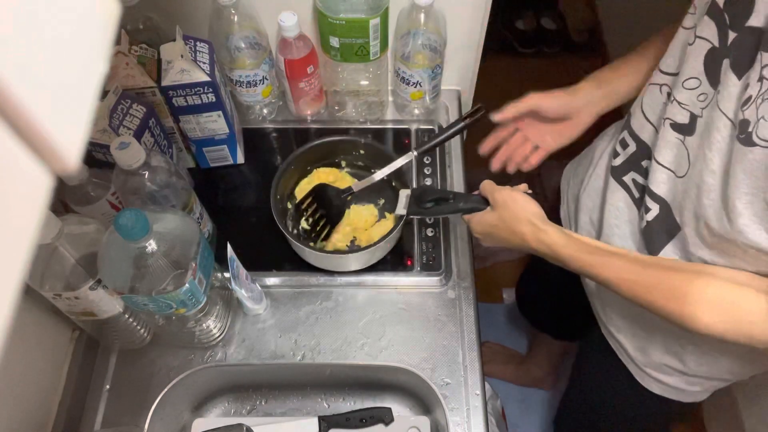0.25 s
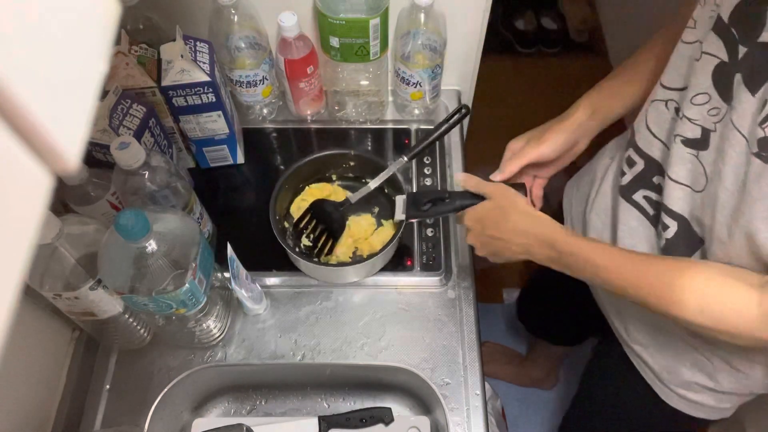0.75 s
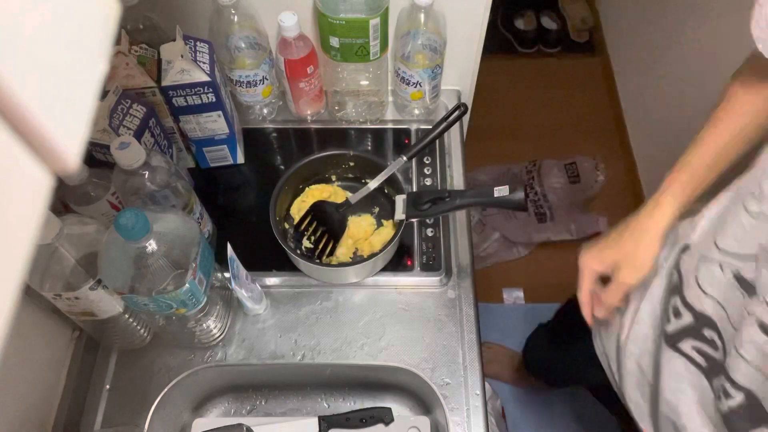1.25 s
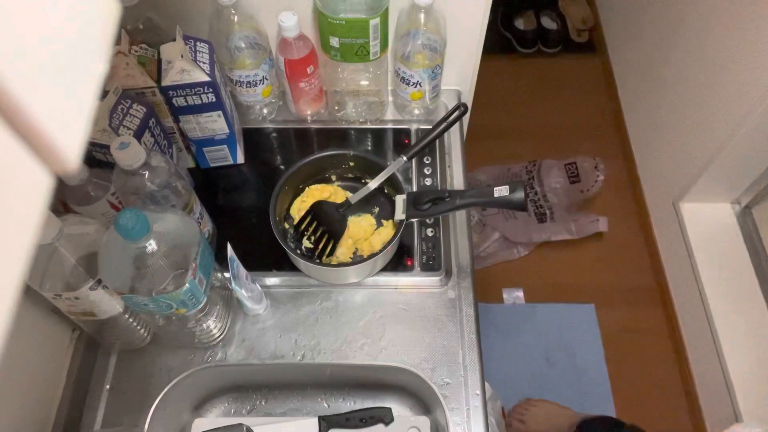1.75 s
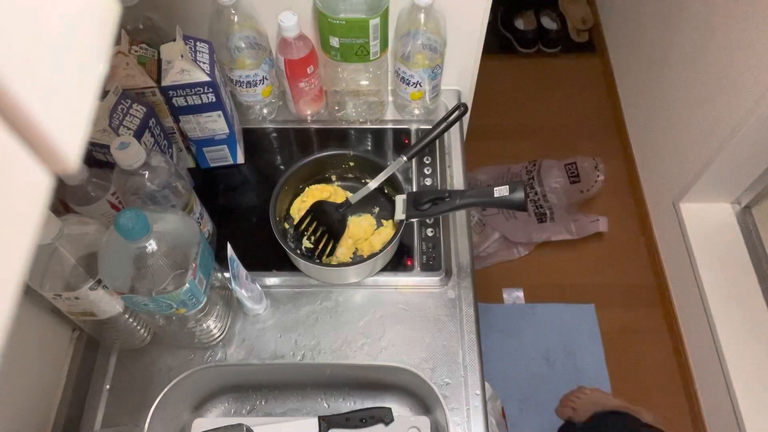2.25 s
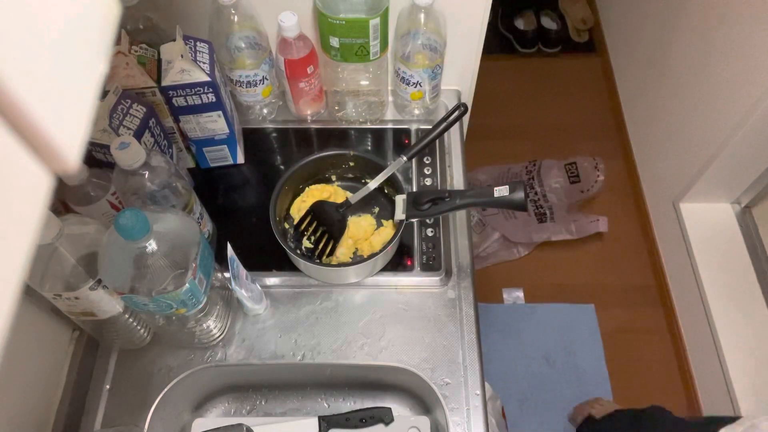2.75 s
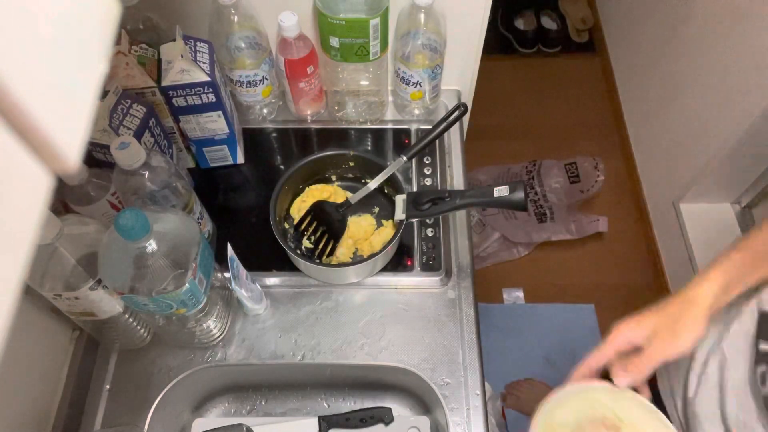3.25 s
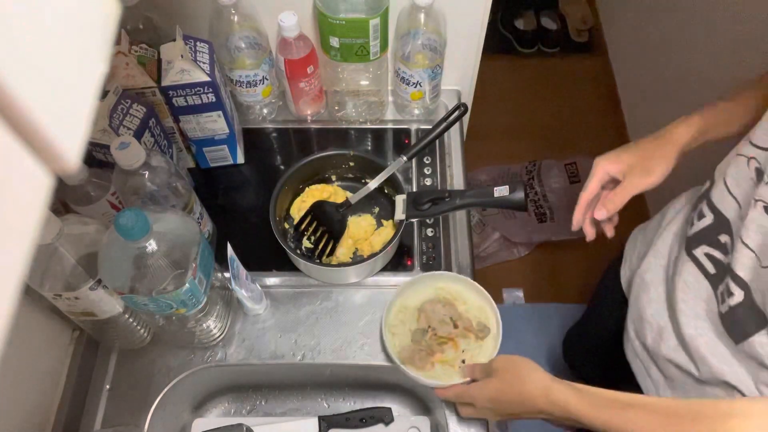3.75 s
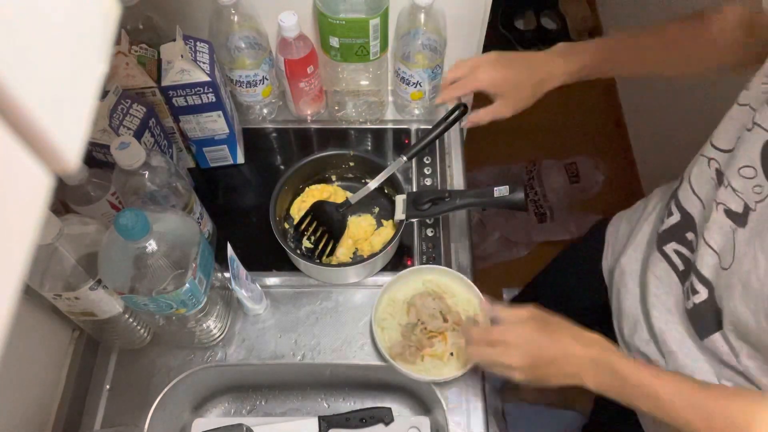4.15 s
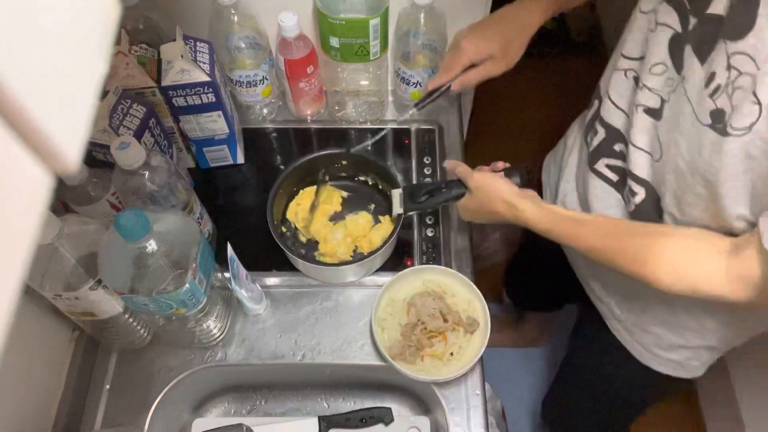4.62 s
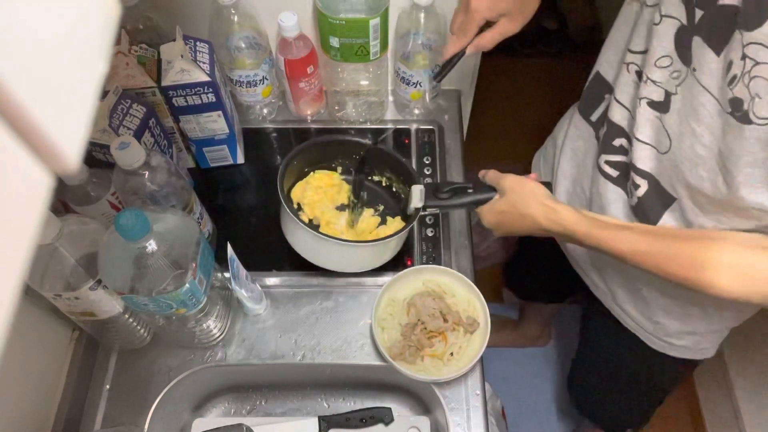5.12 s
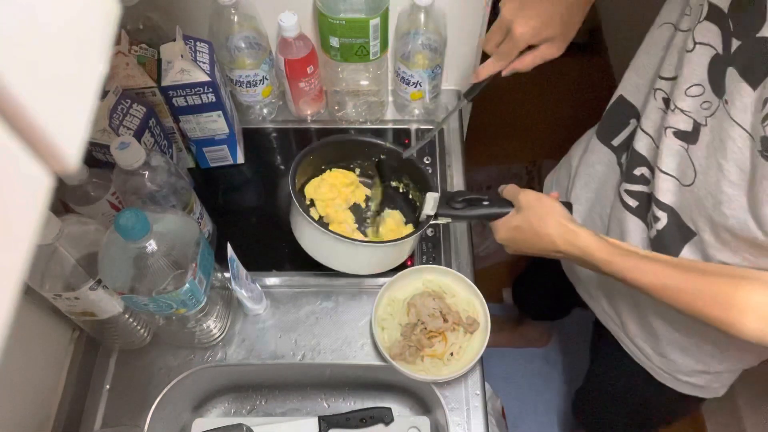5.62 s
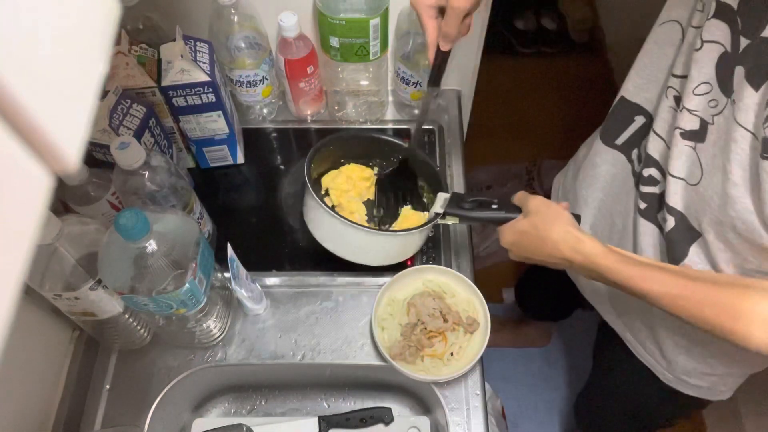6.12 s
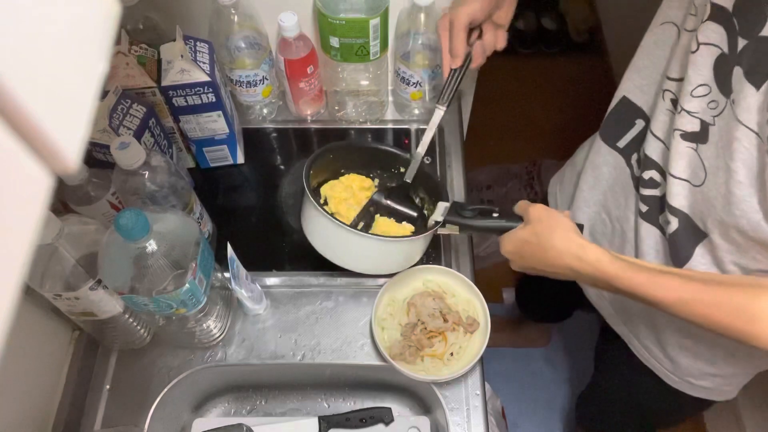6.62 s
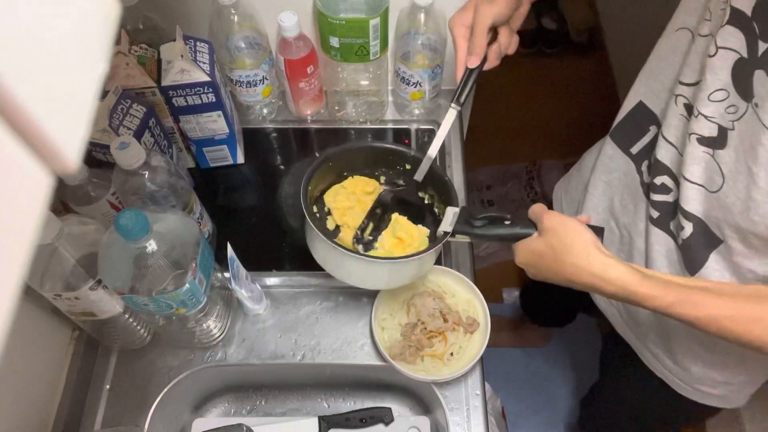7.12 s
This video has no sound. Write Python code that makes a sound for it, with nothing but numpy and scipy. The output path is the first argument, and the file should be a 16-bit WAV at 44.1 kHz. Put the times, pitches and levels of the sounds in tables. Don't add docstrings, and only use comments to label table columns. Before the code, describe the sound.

A phone close to the cooktop hears steady low extractor and cooktop fans in stereo. Early on come a faint rim tap, a hard plastic snap and a heavy dull pan thump. Only small ticks and soft clothing follow, until a bowl lands with a boomy clunk and tiny bounce. Later a turner knocks the saucepan sharply, then taps and scrapes it in a quick cluster before the hum is left with slight rustling.

```python
import sys
import numpy as np
from scipy import signal
from scipy.fft import rfft, irfft
from scipy.io import wavfile
from scipy.ndimage import uniform_filter1d

SR = 44100
rng = np.random.default_rng(int(sys.argv[2]) if len(sys.argv) > 2 else 0)


def inscribe(sig):
    pcm = np.round(np.clip(np.atleast_2d(sig).T, -1, 1) * 32767)
    wavfile.write(sys.argv[1], SR, pcm.astype(np.int16))


def magnitude_from_level(level_db):
    exponent = np.asarray(level_db, float) / 20
    return 10 ** exponent


N = 325458


def evened(x):
    return x / np.sqrt(np.mean(x ** 2) + 1e-20)


def unit_energy(x):
    return x / np.linalg.norm(x)


def read(points, hz):
    f, value = np.transpose(points)
    return np.interp(np.log(hz + 1), np.log(f + 1), value)


def add(mix, s, sound):
    part = mix[..., round(s * SR):][..., :sound.shape[-1]]
    part += sound[..., :part.shape[-1]]


def mirrored(x):
    return np.concatenate([x, x[:, ::-1]], axis=1)


def colour(points):
    log_gain = np.log(magnitude_from_level(read(points, abs(np.fft.fftfreq(4096, 1 / SR)))))
    taps = np.fft.ifft(np.exp(np.conj(signal.hilbert(log_gain)))).real[:2048]
    return unit_energy(taps)


def ring(modes, rise=0.00061, turns=0):
    t = np.arange(SR // 2) / SR
    sound = np.zeros(len(t))
    for hz, db, t60 in modes:
        build_up = 1 - np.exp(-t * hz / (turns + 0.0011))
        sound += magnitude_from_level(db - 60 * t / t60) * np.sin(2 * np.pi * hz * t) * build_up
    return unit_energy(sound * (1 - np.exp(-t / rise)))


def swells(rows, sharp):
    out = np.zeros(N)
    for middle, length, db in rows:
        add(out, middle - length / 2, magnitude_from_level(db) * np.hanning(round(length * SR)) ** sharp)
    return out


def grains(per_s, spread_db):
    size = magnitude_from_level(spread_db * np.minimum(rng.exponential(1, N), 4))
    happens = rng.random(N) < per_s / SR
    return evened(size * rng.standard_normal(N) * happens)


# (f/Hz, level/dB [per Hz])
AIR = [(25, -87.5), (45, -67), (65, -64), (140, -61), (200, -70), (350, -78.5), (480, -78.5), (850, -80),
       (1450, -91), (2500, -91), (3600, -100), (6000, -105), (9000, -114), (15500, -136)]
# (f/Hz, width f/Hz, level/dB [per Hz])
DUCT = [(83.3, 11.9, -45.5), (110.3, 4.7, -57.5), (158, 7.2, -52.5), (260.1, 38.2, -54.5), (297.7, 28, -60),
        (425.7, 16.9, -63), (594, 40, -74), (656, 79, -82), (701.5, 61, -71), (1040.3, 99, -71),
        (1176, 55, -74), (1340, 13, -74.5), (1680, 520, -83.5), (2025, 370, -86.5), (2933, 850, -98)]


def fans():
    frames, hz = N // 1024 + 5, np.fft.rfftfreq(4096, 1 / SR)
    a, b, patches = rng.standard_normal((2, frames, 2049, 3)).transpose(3, 0, 2, 1)
    patches = uniform_filter1d(patches[0], 30, 0)
    patches = evened(uniform_filter1d(patches, 4, 1))
    power = magnitude_from_level(read(AIR, hz)) ** 2
    for f, width, db in DUCT:
        power += magnitude_from_level(db) ** 2 / (1 + (2 * (hz - f) / width) ** 2) ** 2
    spectrum = (a + 1j * b) * np.sqrt(power)[:, None] * magnitude_from_level(1.8 * patches)
    noise = signal.istft(spectrum, nperseg=4096, noverlap=3072)[1]
    return evened(noise[:, :N]) * np.sqrt(power.sum() * SR / 4096)


# (middle t/s, length t/s, level/dB, f/Hz)
HUM_SWELLS = [(0.192, .26, -27.5, 81.4), (0.375, 0.11, -27, 83.9), (0.601, .25, -35.5, 90.6),
              (0.755, 0.0857, -23, 80.4), (0.869, 0.17, -26, 84.2), (1.097, .3, -26, 82.8), (1.24, .12, -31, 83),
              (1.365, .24, -31, 87.2), (1.771, .14, -30.5, 86), (1.905, 0.24, -30.5, 86),
              (2.319, 0.29, -30, 85.7), (2.522, 0.31, -27, 85.7), (2.768, .3, -27, 86.1),
              (2.946, 0.12, -27.5, 83.3), (3.274, .17, -23.5, 81.2), (3.427, .22, -26.5, 86.1),
              (3.642, .16, -24.5, 84.1), (3.924, 0.18, -23, 85.5), (4.054, .24, -28, 82),
              (4.244, .13, -25.5, 87.4), (4.474, .3, -29.5, 89), (4.755, 0.1256, -32.5, 84.5),
              (4.939, .28, -27, 89.15), (5.194, 0.29, -27.5, 89.8), (5.608, .12, -33, 80.4),
              (5.841, 0.16, -33.5, 85.2), (6.072, 0.25, -31.5, 78.85), (6.687, 0.1365, -29.5, 83.9),
              (6.997, .26, -26.5, 84.9), (7.215, 0.16, -27.5, 87)]


def hum():
    peak_db, sharpness = 2.5, 1.48
    out = np.zeros(N)
    for (middle, length, db, hz), phase in zip(HUM_SWELLS, rng.random(len(HUM_SWELLS))):
        t = np.arange(round(length * SR)) / SR
        swell = np.sin(np.pi * t / length) ** sharpness
        add(out, middle - length / 2, magnitude_from_level(db + peak_db) * swell * np.sin(2 * np.pi * (hz * t + phase)))
    return out


# (f/Hz, time to fall 60 dB t/s)
ROOM = [(100, 0.93), (260, 0.85), (700, 0.56), (1840, 0.32), (4850, 0.42), (12800, 0.25)]


def room(x):
    taps = np.zeros((2, SR))
    at = np.arange(200, SR - 20, 20) + rng.integers(0, 20, (2, (SR - 201) // 20))
    np.put_along_axis(taps, at, rng.choice([-1., 1.], at.shape), 1)
    hz, t, z = signal.stft(taps, SR, nperseg=256)
    fade = magnitude_from_level(-60 * t / read(ROOM, hz)[:, None])
    tail = signal.istft(z * fade, SR, nperseg=256)[1]
    return signal.fftconvolve(x[None], tail / np.linalg.norm(tail[0]), axes=1)[:, :N]


# (middle t/s, length t/s, level/dB)
MOVES = [(.93, .25, -67), (1.55, 1, -79.5), (2.13, .2, -84), (2.6, 0.23, -81), (2.885, 0.07, -76),
         (3.095, 0.026, -81), (3.28, 0.19, -73), (3.47, 0.079, -63), (3.53, 0.067, -83), (3.655, 0.05, -81),
         (4.07, 0.39, -79), (4.37, 0.099, -67.5), (4.5, 0.19, -61), (4.68, 0.46, -70.5),
         (5.125, 0.18, -67.5), (5.195, .08, -85.5), (5.262, 0.078, -75.5), (5.65, 0.38, -72.5),
         (5.8, 0.068, -69.5), (5.89, .15, -65), (6.09, 0.33, -65), (6.385, 0.099, -67.5), (6.52, 0.24, -82),
         (6.72, 0.26, -72), (6.83, 0.15, -73), (7.22, 0.36, -80.5)]
# (f/Hz, level/dB [per Hz])
CLOTH = [(1500, -18.5), (3000, 7.5), (5000, -4), (7500, 4), (10000, -4), (13000, -7), (16000, -17)]


def rustle():
    flutter_db, flutter_s = 3, 0.013
    crackle = signal.oaconvolve(grains(4700, 3.2), colour([(300, -36.5)] + CLOTH))[:N]
    flutter = evened(uniform_filter1d(rng.standard_normal(N), size=round(flutter_s * SR)))
    return magnitude_from_level(3.0 + flutter_db * flutter) * swells(MOVES, 0.73) * crackle


# (t/s, peak level/dB, f/Hz, time to fall 60 dB t/s)
TICKS = [(0.8452, -46.5, 12150, 0.064), (0.9282, -49.5, 11920, 0.046), (1.057, -65, 4900, 0.068),
         (1.7598, -51.5, 4560, 0.053), (2.0851, -56.5, 4710, 0.054), (2.364, -59.5, 4800, 0.048),
         (3.0885, -80, 4570, 0.055), (3.27, -51.5, 4760, 0.078), (3.4436, -48, 5340, 0.049),
         (3.8311, -35, 2510, 0.036), (3.8506, -49.5, 2600, 0.034), (3.9086, -51, 4670, 0.18),
         (4.3697, -45.5, 8850, 0.067), (4.4443, -49.5, 5030, 0.054), (4.7828, -60.5, 5600, 0.023),
         (5.182, -45.5, 4750, 0.068), (5.2474, -54, 4830, 0.05), (5.377, -49, 11500, 0.016),
         (5.3908, -30.5, 2200, .015), (5.464, -58, 13500, .02), (5.564, -49, 4700, 0.079),
         (5.9559, -41.5, 2520, 0.027), (5.9908, -48, 2400, .02), (6.1489, -47, 3000, 0.022),
         (6.5095, -58, 4600, 0.022), (6.6427, -60, 5000, 0.05), (6.858, -62.5, 4600, 0.057),
         (7.0004, -61.5, 4900, 0.077)]


def ticks():
    out, t = np.zeros(N), np.arange(SR // 8) / SR
    for s, db, hz, t60 in TICKS:
        tone = [(hz / 4, -14), (hz / 1.9, -4), (hz, 0), (hz * 1.3, -6), (hz * 4, -20)]
        burst = signal.fftconvolve(rng.standard_normal(len(t)), colour(tone))[:len(t)]
        add(out, s, magnitude_from_level(db - 5.0 - 60 * t / t60) * burst * np.minimum(t / 0.0019, 1))
    return out


# (f/Hz, level/dB, time to fall 60 dB t/s)
PAN = [(706, -8, 0.32), (653, -1.5, 0.12), (732.5, -2.5, 0.11), (873, -10, 0.022), (1296, 1, 0.071),
       (1344, -14, 0.13), (1962, -7.5, .05), (2190, -8.5, 0.045), (2215, -7.5, .09), (3240, -16, 0.082),
       (3924, -31, .07), (5098, -28, 0.076), (6100, -35, 0.063), (7230, -27, 0.15)]
# (middle t/s, length t/s, pressure level/dB, floor flexing level/dB)
STROKES = [(5.812, 0.053, -71.5, -42), (5.885, .06, -76, -53), (7.3, 0.03, -72, -45),
           (5.855, 0.047, -47.5, -45.5), (6.025, 0.16, -54, -55.5), (5.2, 0.12, -65, -63),
           (5.4, 0.043, -61, -48), (6.312, 0.061, -69.5, -60), (5.4, 0.062, -58, -43)]
# (middle t/s, length t/s, level/dB)
SINGS = [(5.8, 0.065, -76), (5.865, .05, -60), (6.04, .1, -66), (6.11, .08, -63), (6.16, .07, -61)]


def scrape():
    edge = swells([row[:3] for row in STROKES], 1.0)
    flex = swells([row[:2] + row[3:] for row in STROKES], 0.48)
    slips = grains(3200, 3.5)
    pressed = [(f, db + 16.0 * np.log2(f / 716), 0.78 * t60) for f, db, t60 in PAN[5:]]
    low = [(f, db, 0.33 * t60) for f, db, t60 in PAN[:3]]
    high = [(f, db, 1.3 * t60) for f, db, t60 in PAN[-3:]]
    plastic = colour([(500, -14.0), (1500, 8.0), (3000, 0), (7000, -7.0), (15000, -22.5)])
    rings = signal.oaconvolve(slips * edge, ring(pressed))[:N]
    hiss = signal.oaconvolve(slips * edge, plastic)[:N]
    floor = signal.oaconvolve(slips * flex, ring(low))[:N]
    sing = signal.oaconvolve(slips * swells(SINGS, 0.94), ring(high))[:N]
    return sing + magnitude_from_level(-10.0) * rings + magnitude_from_level(5.5) * hiss + magnitude_from_level(1.5) * floor


def rattle(t, t60, light, snap_db, points):
    snap_s = 0.01
    bounces = magnitude_from_level(2.5 * evened(uniform_filter1d(rng.standard_normal(len(t)), 60)))
    noise = rng.standard_normal(len(t)) * bounces
    bass = signal.filtfilt(*signal.butter(2, 500, fs=SR), noise)
    crack = signal.filtfilt(*signal.butter(2, 2600, "high", fs=SR), noise)
    rise = 1 - np.exp(-t / (0.0006 + 0.004 * light ** 4))
    sound = crack * magnitude_from_level(-60 * t / (1.4 * t60)) * rise
    sound += (noise - bass - crack) * magnitude_from_level(-60 * (t / t60) ** 2.0) * rise ** 2
    sound += bass * magnitude_from_level(-60 * t / (1.22 * t60)) * (1 - np.exp(-t / 0.0022)) ** 2
    z = rfft(sound)
    level = np.sqrt(uniform_filter1d(abs(z) ** 2, size=25))
    sound = irfft(z / level, len(t)) * np.cos(np.pi / 2 * t / t[-1]) ** 2
    sound = evened(sound) + magnitude_from_level(snap_db) * evened(crack * magnitude_from_level(-60 * t / snap_s))
    return unit_energy(signal.fftconvolve(sound, colour([(35, -38.5)] + points + [(17000, -95.0)])))


# (t/s, level/dB, rattle's time to fall 60 dB t/s, pan ring level/dB, counter ring level/dB)
BLOWS = [
    (0.078, -27.5, 0.055, -7, -31),
    (0.491, -12, 0.067, -37, -23),
    (.7298, -11, 0.099, -19.5, -20),
    (3.7468, -10, 0.079, -23, -15.5),
    (5.3863, -15.5, 0.048, 3, -14),
    (3.8288, -33, 0.086, -21, -20),
    (5.783, -54.5, 0.14, 7.5, -31),
    (5.852, -40.5, 0.038, 0, -31),
    (5.945, -43.5, 0.13, -5.5, -27),
    (6.0187, -46, 0.21, 7, -34),
]
# (f/Hz, level/dB [per Hz])
TAP = [(100, -21.5), (750, 9), (2200, 4.5), (3200, -3.5), (5000, -20.5), (7500, -21.5), (13000, -28),
       (15500, -51)]
DROP = [(100, -11), (170, -7), (280, -23.5), (450, -24), (750, -23), (1200, 1.5), (2000, -14),
        (3200, -14.5), (5000, -31), (7500, -5), (10000, -16), (13300, -21.5), (14200, -45.5)]
LATCH = [(100, -12.5), (170, -3), (280, -1.5), (450, 1), (850, -3), (1300, -10), (2000, -10.5), (3200, -14),
         (5000, -22.5), (7500, -18.5), (10000, -27.5), (13000, -39), (15500, -48.5)]
THUD = [(100, -22), (170, -6), (280, -8.5), (450, -12), (900, -23.5), (1200, -22), (2000, -27), (3200, -30),
        (5000, -33.5), (7500, -34), (10000, -37), (14300, -48.5), (15100, -70.5)]
BOWL = [(100, 10), (170, 0), (280, -31.5), (450, -6), (850, -16.5), (1200, -18), (2000, -16.5),
        (3200, -19.5), (5000, -32.5), (7500, -36), (10000, -41), (13000, -49.5), (15500, -58)]
KNOCK = [(100, -25.5), (170, -34), (280, -19), (450, -21), (750, 2.5), (1000, -9.5), (2000, -12),
         (3200, -23), (5000, -32.5), (7500, -32), (10000, -45), (14500, -50), (15500, -59)]
COLOURS = [DROP, LATCH, THUD, BOWL, KNOCK] + [TAP] * 5
# (f/Hz, level/dB, time to fall 60 dB t/s)
LATCH_BODY = [(133, 1, .07), (250.6, 2.5, 0.08), (330, -4, 0.07), (545, -0.5, 0.071), (636.6, -11.5, 0.31),
              (687, -2.5, .08), (996, -6, 0.069), (1115, -11.5, 0.078), (1505, -1.5, .05),
              (1763, -1.5, 0.032), (2230, -8.5, 0.041), (2414, -9, 0.063), (2688, -10.5, 0.049),
              (3320, -11, 0.06)]
THUD_BODY = [(123, 5.5, 0.052), (268.4, -1.5, 0.19), (370.5, -11.5, 0.28), (440.6, -11, .25),
             (528, -2, .16), (628, -7.5, 0.42), (714, 0.5, 0.085), (1065, -8, 0.13), (1196, -7, 0.1),
             (1284, -10.5, .07), (2159, -1, 0.039), (2550, -8.5, 0.074), (3440, -15, .03)]
BOWL_BODY = [(92.8, 2.5, 0.4), (158.7, 0.5, 0.43), (288, -2.5, 0.47), (365.7, -7.5, 0.43),
             (426, -2.5, 0.11), (453, -11, .5), (640, -2.5, 0.38), (682, 1.5, 0.082), (740, -10.5, 0.11),
             (256.3, 2.5, .25), (1051, -6.5, 0.14), (1744, -9.5, .04), (2172, -4.5, .07),
             (2600, -10.5, .05)]
BODIES = [PAN, LATCH_BODY, THUD_BODY, BOWL_BODY] + [PAN] * 6
# (f/Hz, level/dB, time to fall 60 dB t/s)
RIM = [(1095, -3, .1), (1550, 1, .06), (2210, -12, .04), (2720, -9, .05), (3360, -18, .08),
       (4170, -21, .04), (4950, -24, .04), (6420, -22, .08), (9400, -24, .025)]
# (f/Hz, level/dB, time to fall 60 dB t/s)
COUNTER = [(93, -6, .3), (125, 2, .06), (158, -1, .24), (262, 0, .3), (289, -1, .22), (366, -4, .16),
           (430, -4, .22), (520, -8, .1), (560, -7, .14), (634, -4, .35), (700, -6, .1), (1085, -8, .1)]
# level/dB of the rim, object, panel shove, and first hard contact
RIM_DB = [-5, -7, -18] + [-60] * 7
BODY_DB = [-61, 3.5, 1, 3.5] + [-60] * 6
PUSH_DB = [-43, -8.5, 1.5, -10.5] + [-60] * 6
SNAP_DB = [-5, 1, -6, -0.5, -7] + [-30] * 5


def blows():
    push_hz, push_s = 121, 0.025
    room_db, room_light_db = -7.5, 5
    near, wet, t = np.zeros(N), np.zeros(N), np.arange(SR // 5) / SR
    counter = ring(COUNTER, 0.0033)
    push = unit_energy(np.sin(np.pi * np.minimum(t / push_s, 1)) ** 2 * np.cos(2 * np.pi * push_hz * t))
    for (s, db, t60, pan_db, counter_db), points, rim_db, push_db, body, body_db, snap_db in zip(
            BLOWS, COLOURS, RIM_DB, PUSH_DB, BODIES, BODY_DB, SNAP_DB):
        light = np.clip(-db / 40, 0, 1)
        pan = ring([(f, d + 5.8 * light ** 2 * np.log2(f / 716), ring_s) for f, d, ring_s in PAN], 0.0051)
        rim = ring([(f, d + 31.0 * light ** 2 * np.log2(f / 1095), ring_s) for f, d, ring_s in RIM])
        sound = magnitude_from_level(pan_db) * pan + magnitude_from_level(counter_db) * counter + magnitude_from_level(rim_db) * rim
        sound += magnitude_from_level(body_db) * ring(body, 0.0017, turns=1.3)
        add(sound, 0, rattle(t, t60, light, snap_db, points))
        add(sound, 0, magnitude_from_level(push_db) * push)
        add(near, s, magnitude_from_level(db + 26.5) * sound)
        add(wet, s, magnitude_from_level(db + 22 + room_db + room_light_db * light ** 4) * sound)
    return near, wet


# (f/Hz, likeness [0-1])
ALIKE = [(90, 0.94), (110, 0.69), (160, 1), (350, 0.67), (1000, 0.63), (2700, 0.6), (3600, 0.17),
         (5000, 0.075), (6500, .4), (7050, .985), (8100, .99), (8500, 0.8), (9600, .85), (10400, 0.96),
         (15500, .96)]


def scene():
    near, wet = blows()
    small = ticks() + scrape() + rustle()
    scatter = rng.standard_normal(1500) * magnitude_from_level(-40 * np.linspace(0, 1, num=1500))
    scattered = signal.oaconvolve(near + small, unit_energy(scatter))[:N]
    direct = np.array([near + small, scattered])
    around = fans() + room(wet + magnitude_from_level(-8) * small)
    shared, other = rfft(mirrored(around + direct))
    alike = np.clip(read(ALIKE, np.fft.rfftfreq(2 * N, 1 / SR)), 0, 1)
    right = alike * shared + np.sqrt(1 - alike ** 2) * other
    return irfft(np.array([shared, right]))[:, :N] + hum()


def roll_off(x):
    return signal.sosfilt(signal.butter(12, 16250, fs=SR, output="sos"), x)


# (f/Hz, phase [radians])
TURN = [(95, 0), (125, 3), (310, 1.3), (500, 6.3), (690, 9.8), (720, 12.3), (980, 19.1), (1250, 20.3),
        (1450, 22), (2050, 22.7), (2650, 25.1), (4200, 28), (8200, 28.3), (10600, 25.13)]
# (f/Hz, level/dB)
TILT = [(45, 12.5), (68, 5.5), (88, 8), (110, 1), (135, 6.5), (200, -5.5), (300, -5.5), (430, -13),
        (520, -1), (700, -2.5), (1000, -0.5), (5000, -1.5), (7000, 0), (10000, 0)]


def record(dry):
    knee, ceiling = .6, .96
    hz = np.fft.rfftfreq(2 * N, 1 / SR)
    tilt = magnitude_from_level(read(TILT, hz) * np.array([[.5], [-.5]]))
    lag = np.exp(-1j * read(TURN, hz) * np.array([[1], [0]]))
    ports = tilt / np.sqrt((tilt ** 2).mean(0)) * lag
    edge = np.sin(np.pi / 2 * np.minimum(np.arange(N)[::-1] / 400, 1)) ** 2
    x = irfft(rfft(mirrored(dry)) * ports)[:, :N] * edge
    over, span = np.maximum(abs(x) - knee, 0), ceiling - knee
    x = x - np.sign(x) * (over - span * np.tanh(over / span))
    return roll_off(x)


dry = scene()
out = record(dry)
inscribe(out)
```